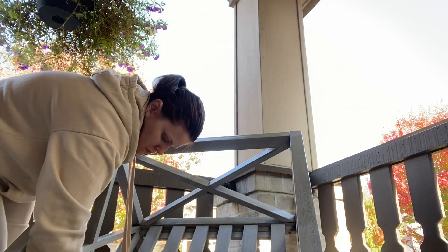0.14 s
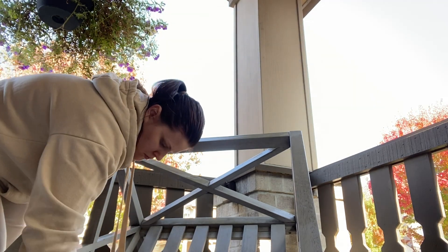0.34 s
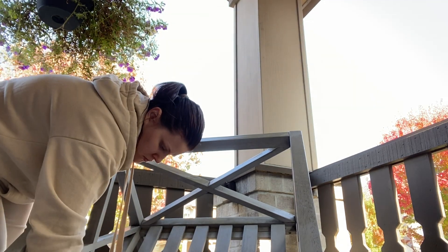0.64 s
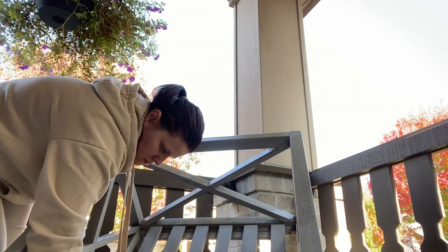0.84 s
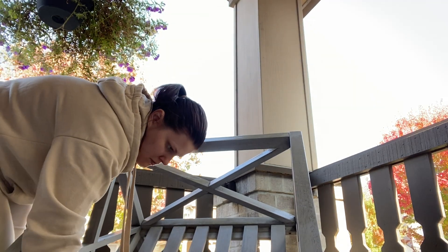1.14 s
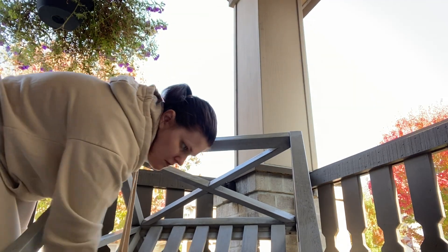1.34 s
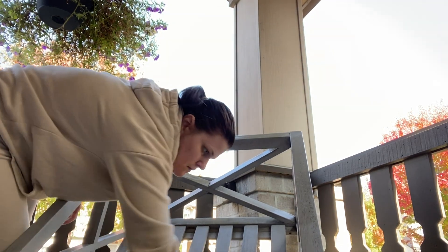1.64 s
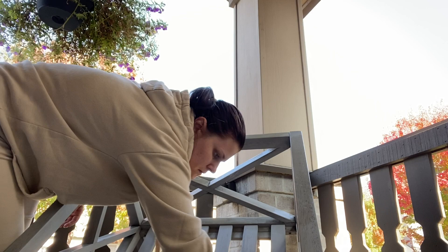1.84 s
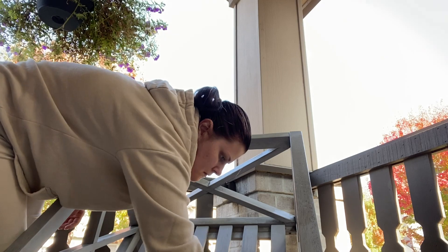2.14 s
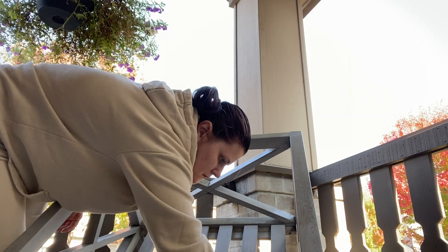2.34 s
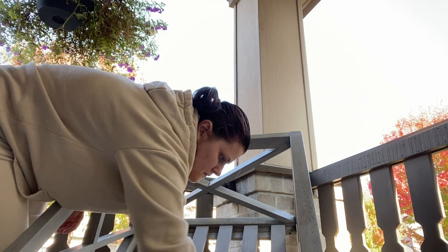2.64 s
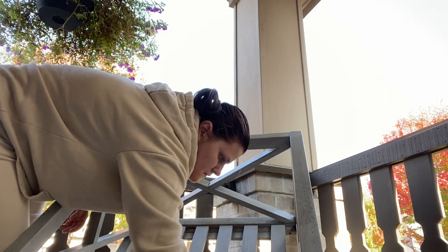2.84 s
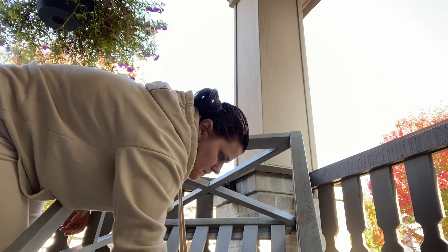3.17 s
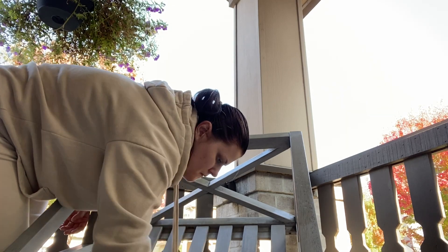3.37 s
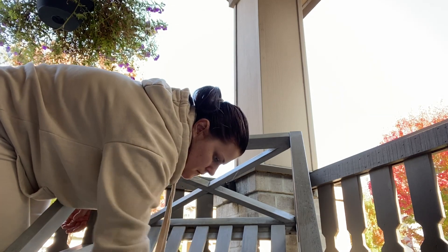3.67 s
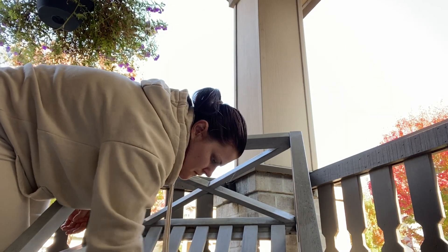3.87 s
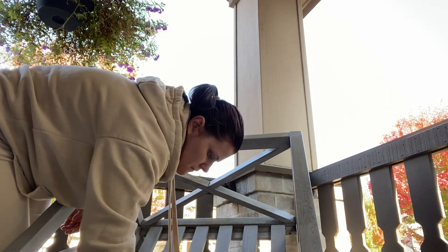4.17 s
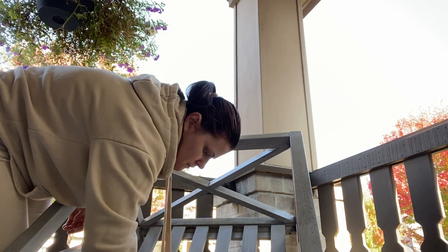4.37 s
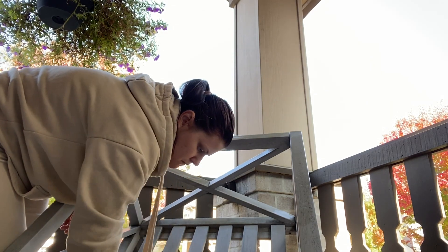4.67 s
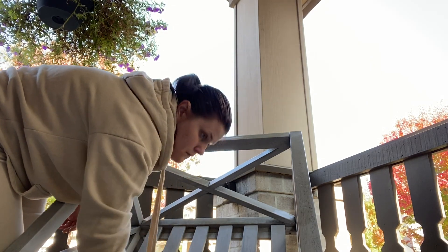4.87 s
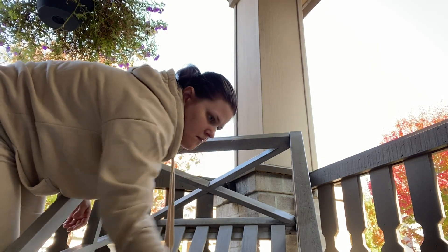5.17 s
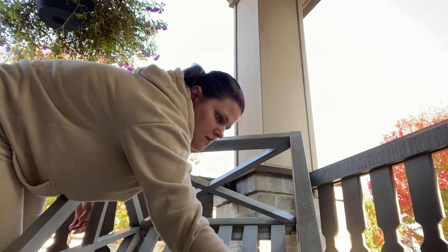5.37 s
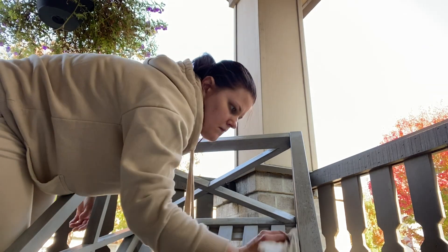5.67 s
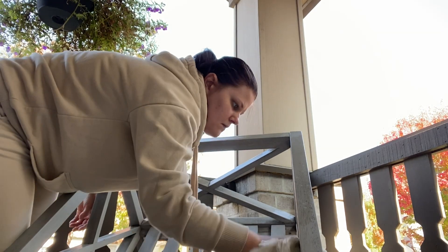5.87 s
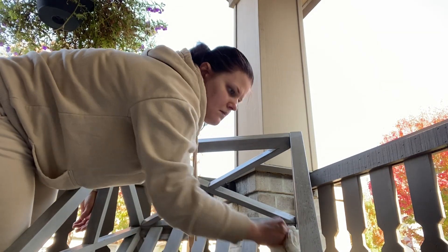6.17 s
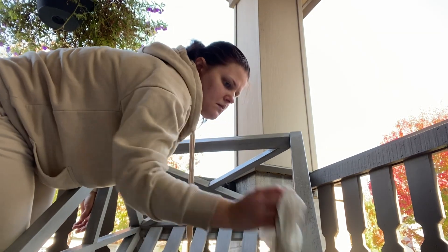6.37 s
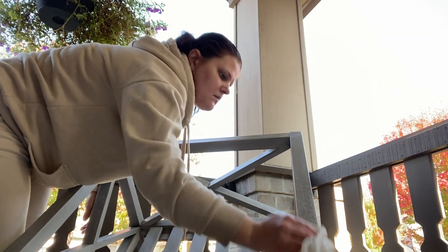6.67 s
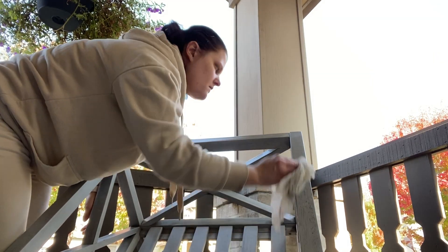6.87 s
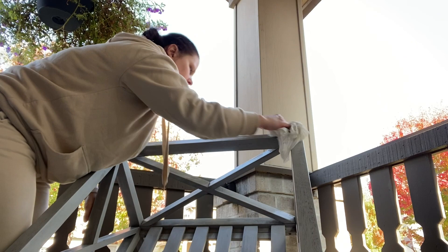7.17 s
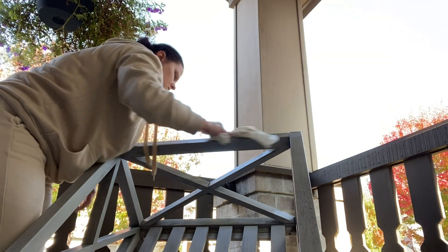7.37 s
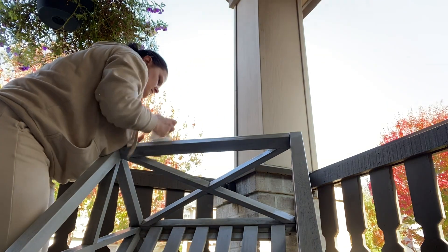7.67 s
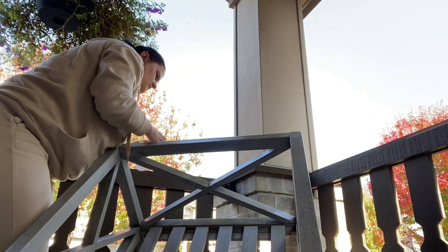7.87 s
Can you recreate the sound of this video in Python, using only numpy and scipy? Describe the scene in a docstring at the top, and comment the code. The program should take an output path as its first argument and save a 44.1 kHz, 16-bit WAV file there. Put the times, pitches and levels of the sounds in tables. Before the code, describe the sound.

Soft cloth wiping dominates the detail: short scrubs at first, denser and hissier around the middle, then longer, lighter sweeps. Low hollow knocks of the chair on deck boards stand out far louder than the wiping, especially in the later half. Brief slat squeaks and a few sharp ringing ticks punctuate it. A stereo microphone sits low and near the chair, outdoors, picking up deck thumps and distant road rumble.

```python
"""Distant traffic rumbles throughout, as shaped noise; from the start a cloth wipes a painted wooden chair
on a porch in short strokes of hiss and scrub noise. From 0.4 s the chair rocks and knocks its legs on the
deck boards: decaying modes and noise bursts. From 0.5 s single slats sing, as noise in narrow resonances.
From 1.3 s something small and hard ticks on a rail: noise clicks and ringing modes.
Two ports hear airborne bass nearly alike; the treble reaches the right one late and upside down."""
import sys
import numpy as np
from scipy import signal
from scipy.fft import rfft, irfft, next_fast_len
from scipy.io import wavfile
from scipy.ndimage import uniform_filter1d

SR = 44100
rng = np.random.default_rng(int(sys.argv[2]) if len(sys.argv) > 2 else 0)


def put_to_file(sound):
    """Save the sound as 16-bit audio at rate SR, in the file named by the first command-line argument."""
    columns = np.atleast_2d(sound).T  # one column per channel
    safe = np.clip(columns, -1, 1)
    whole_steps = np.round(safe * 32767)
    wavfile.write(sys.argv[1], SR, whole_steps.astype(np.int16))


N = 353241


def gain_of(db):
    """Decibels to gain."""
    return 10 ** (np.asarray(db) / 20)


def evened(x):
    """Scales to rms 1."""
    return x / np.sqrt(np.mean(x ** 2) + 1e-20)


def read(points, hz):
    """Reads a (Hz, value) table on a log frequency axis."""
    f, value = np.transpose(points)
    return np.interp(np.log(hz + 1), np.log(f + 1), value)


def add(mix, start_s, sound):
    """Lays a sound into the mix at start_s."""
    part = mix[:, round(start_s * SR):][:, :sound.shape[1]]
    part += sound[:, :part.shape[1]]


def band_pass(order, edges_hz):
    """Butterworth band-pass coefficients."""
    return signal.butter(order, edges_hz, "band", fs=SR)


def noise(colour_db, size, patchy_db, patch_hz, patch_s, lo_hz, hi_hz):
    """Two unrelated noises of one colour with drifting patches, rms 1 between lo_hz and hi_hz."""
    hop, hz = size // 4, np.fft.rfftfreq(size, 1 / SR)
    a, b, c, d, patches = rng.standard_normal((N // hop + 5, len(hz), 5)).T
    patches = uniform_filter1d(patches, max(round(patch_hz * size / SR), 1), 0)
    patches = evened(uniform_filter1d(patches, max(round(patch_s * SR / hop), 1), 1))
    level = gain_of(colour_db(hz)[:, None] + patchy_db * patches)
    in_band = (hz >= lo_hz) & (hz <= hi_hz)
    share = (level[in_band] ** 2).sum() / (level ** 2).sum()
    spectra = np.array([a + 1j * b, c + 1j * d]) * level
    sound = signal.istft(spectra, nperseg=size, noverlap=size - hop)[1][:, :N]
    return evened(sound) / np.sqrt(share)


def ring(modes, t, rise_s, scatter_db):
    """Modes struck together, swelling over rise_s, left peak 1; each blow favours them differently."""
    hz, db, t60_s, right_ratio = np.transpose(modes)[:, :, None]
    decay_db = db - 60 * t / t60_s + scatter_db * rng.standard_normal(hz.shape)
    size = gain_of(decay_db) * (1 - np.exp(-t / rise_s)) ** 2
    left = size * np.sin(2 * np.pi * hz * t)
    return np.array([left.sum(0), (right_ratio * left).sum(0)]) / abs(left.sum(0)).max()


# Road noise colour. Each row: frequency in Hz, level in dB.
RUMBLE_COLOUR = [(33, -44), (55, 4), (94, 1), (180, -8), (300, -15.5), (500, -18.5), (813, -19.5),
                 (1470, -42), (3000, -51.5), (15000, -84)]
# Slow swell. Each row: time in seconds, rumble level in dB, tyre roar in dB against the rumble.
TRAFFIC_SWELL = [(0, -45, -1), (.6, -44.5, 0), (1.8, -45.5, -4), (3.3, -44, -5), (4.15, -45.5, -3.5),
                 (4.6, -44.5, -3), (8.01, -45.5, -3.5)]


def traffic():
    """Far road noise, lumpy in the bass, swelling slowly; the tyre roar above it comes and goes."""
    s, rumble_db, roar_db = np.transpose(TRAFFIC_SWELL)
    t = np.arange(N) / SR
    road = noise(lambda hz: read(RUMBLE_COLOUR, hz), 2048, 2.3, 60, .15, 40, 200)
    roar = signal.filtfilt(*band_pass(1, [350, 1000]), road)
    rumble_gain = gain_of(np.interp(t, s, rumble_db))
    roar_gain = gain_of(np.interp(t, s, rumble_db + roar_db))
    return (road - roar) * rumble_gain + roar * roar_gain


# Strokes of the cloth. Each row: time of full speed in seconds, run-up in seconds, hold in seconds,
# gain of the fibre hiss in dB, gain of the slat scrub in dB.
CLOTH_STROKES = [(0, .05, 0.0012, -69, -59.5), (0.213, 0.038, 0.054, -65, -62), (0.432, 0.065, 0, -81, -82),
                 (0.547, 0.071, 0, -62.5, -65), (.645, 0.026, 0, -63, -68.5),
                 (0.785, 0.042, 0.0015, -70, -65.5), (0.952, 0.027, 0.0059, -66.5, -60),
                 (1.186, 0.23, 0.28, -74, -65), (1.607, 0.41, 0.086, -66.5, -68.5),
                 (1.82, 0.18, 0.032, -68, -60), (1.942, 0.055, 0.049, -66, -60),
                 (2.115, 0.042, 0.1, -71.5, -66), (2.3, 0.25, 0.13, -76, -69.5),
                 (2.397, 0.063, 0, -68, -54), (2.628, .033, 0, -75, -66), (2.811, 0.1, 0.075, -69, -58),
                 (3.159, 0.027, 0.043, -70.5, -65), (3.43, 0.024, 0.0012, -71, -58),
                 (3.578, 0.045, 0.0033, -77, -61.5), (3.628, 0.056, 0.0066, -60.5, -54.5),
                 (3.921, 0.051, 0.15, -72, -73), (4.032, 0.085, 0.017, -73, -64),
                 (4.085, 0.042, 0.044, -80, -65), (4.24, 0.059, 0.023, -71, -64.5),
                 (4.399, 0.029, 0.0037, -69, -52.5), (4.454, 0.059, 0.039, -62, -64),
                 (4.599, 0.14, 0, -63.5, -63), (4.735, 0.046, 0.05, -66.5, -65.5),
                 (4.875, 0.036, 0.039, -60.5, -64.5), (4.988, 0.28, 0.026, -70.5, -69),
                 (5.245, 0.36, 0.044, -67.5, -66), (5.412, 0.21, 0.038, -65, -66.5),
                 (5.551, 0.15, 0.077, -64, -72.5), (5.786, 0.12, 0, -67, -66.5),
                 (5.863, 0.034, 0.15, -63.5, -70.5), (6.107, 0.027, 0.054, -60, -66),
                 (6.473, 0.13, 0, -72, -71), (6.61, 0.099, 0.38, -70, -70), (7.012, .1, 0.066, -77, -76.5),
                 (7.148, 0.021, 0.39, -66, -67), (7.72, 0.017, 0.053, -88, -67.5),
                 (7.925, 0.056, 0.17, -76, -66)]
EDGE_DB, LIFT_S = -28.5, 0.1  # run-up and lift-off are timed to this level
RISE_BEND, LIFT_BEND = 1.3, 1.11  # 1 = straight in dB, more = rounder top
HISS_REST_DB, SCRUB_REST_DB = -85.5, -95.5  # the cloth never quite rests


def stroke():
    """Hiss and scrub gains: each stroke runs up, holds and lifts off; overlaps add in power."""
    t = np.arange(0, N, 64) / SR
    s, rise_s, hold_s, hiss_db, scrub_db = np.transpose(CLOTH_STROKES)[:, :, None]
    before = np.maximum(s - t, 0) / np.maximum(rise_s, .005)
    after = np.maximum(t - s - hold_s, 0) / LIFT_S
    shape_db = EDGE_DB * (before ** RISE_BEND + after ** LIFT_BEND)
    gains = []
    for db, rest_db in ((hiss_db, HISS_REST_DB), (scrub_db, SCRUB_REST_DB)):
        power = (gain_of(db + shape_db) ** 2).sum(0) + gain_of(rest_db) ** 2
        gains.append(np.interp(np.arange(N) / SR, t, np.sqrt(power)))
    return gains


# Hiss colour of the fibres. Each row: frequency in Hz, level in dB.
FIBRE_COLOUR = [(900, -18), (2000, 1), (4000, 4.5), (9000, 4.5), (14000, 2.5), (15800, -1.5)]
# Scrub colour. Each row: frequency in Hz, level in dB.
SCRUB_COLOUR = [(500, -3), (1100, 5), (1800, 5.5), (3000, 2.5), (4500, -4), (6000, -8), (9000, -21.5)]
# Slats under the cloth. Each row: frequency in Hz, width in Hz, boost in dB (half of it in the hiss).
SLAT_PEAKS = [(3770, 150, 2), (4420, 120, 1), (7500, 110, 0)]
# Spot being wiped. Each row: time in seconds, dB by which thin slats sound brighter than broad ones,
# level of the top of the hiss in dB.
WIPED_SPOT = [(.4, -2, -2), (.7, 21, -6), (1.15, -4, 2), (2.5, 0.5, -0.5), (3.5, 9, 1), (4.6, 4, -13),
              (5.3, -14, -5), (6.8, -6.5, 1)]


def slats_db(hz):
    """Boost of the slat resonances."""
    return sum(db / (1 + (2 * (hz - f) / width) ** 2) for f, width, db in SLAT_PEAKS)


def cloth():
    """Fibres hiss over the paint; where the hand presses, small slips sound the slats."""
    light, pressed = stroke()
    even_db, slips_db = 2.2, 2.9  # patchiness: dense fibres hiss more evenly than the slips
    hiss = noise(lambda hz: read(FIBRE_COLOUR, hz) + .5 * slats_db(hz),
                 512, even_db, 300, 0.067, 4400, 18500)
    scrub = noise(lambda hz: read(SCRUB_COLOUR, hz) + slats_db(hz), 512, slips_db, 150, .07, 1500, 7500)
    broad = signal.filtfilt(*signal.butter(2, 2500, fs=SR), scrub)
    low_hiss = signal.filtfilt(*signal.butter(2, 8500, fs=SR), hiss)
    s, thin_db, top_db = np.transpose(WIPED_SPOT)
    t = np.arange(N) / SR
    tilt = gain_of(np.interp(t, s, thin_db / 2))
    top = gain_of(np.interp(t, s, top_db))
    fibres = (low_hiss + (hiss - low_hiss) * top) * light
    slips = (broad / tilt + (scrub - broad) * tilt) * pressed
    return fibres + slips


# Frame modes. Each row: frequency in Hz, level in dB, t60 in seconds,
# size at the right port as a ratio to the left (negative = opposite phase).
FRAME_MODES = [(117.6, -0.5, 0.18, -0.89), (152, 7, 0.092, -0.35), (198, 3, 0.077, 1.63),
               (279.7, -2.5, 0.23, 0.048), (298.5, -1.5, 0.091, 2.02), (313.1, -8.5, 0.24, 1.43),
               (480.3, -2, 0.078, 0.39)]
# Deck board modes. Columns as for the frame: Hz, dB, t60 in seconds, right-to-left ratio.
DECK_MODES = [(54.43, -1.5, 0.73, 0.91), (73.6, 6, 0.21, 0.11), (96.2, 13, 0.087, 0.84)]
# Leg knocks, also played by cracks(). Each row: time in seconds, blow level in dB,
# deck thump level in dB, crack level in dB.
LEG_KNOCKS = [(0.435, -42, -56, -58), (0.58, -40.5, -63, -55.5), (1.356, -20, -68, -40),
              (1.368, -30, -32.5, -44), (1.705, -23, -30, -49), (3.161, -30.5, -35.5, -71),
              (3.183, -42, -39, -49), (5.687, -23, -31, -45), (5.704, -29.5, -61, -43.5),
              (6.21, -21, -30.5, -43.5), (6.365, -25, -28, -58), (6.456, -30.5, -52, -64),
              (6.744, -22, -31, -45), (6.982, -37, -59, -53.5)]


def knocks():
    """A leg lands: the frame modes ring at once, then the deck modes thump."""
    out, t = np.zeros((2, N)), np.arange(SR // 2) / SR
    unevenness_db = 1.5
    # the lower a board rings, the later it swells
    swell_s = 0.83 / np.transpose(DECK_MODES)[0][:, None]
    for s, blow_db, thump_db, _ in LEG_KNOCKS:
        add(out, s - .002, gain_of(blow_db) * ring(FRAME_MODES, t, 0.0045, unevenness_db))
        add(out, s + 0.0115, gain_of(thump_db) * ring(DECK_MODES, t, swell_s, unevenness_db))
    return out


def cracks():
    """Contact noise: a snap strongest in hard blows, a short clatter of slats, the joints settling."""
    out, t = np.zeros((2, N)), np.arange(SR // 4) / SR
    edges_hz = ([1400, 3250], [464, 1210], [1297, 1310], [164, 430])
    bands = [band_pass(2, hz) for hz in edges_hz]
    settling = .18 * (1 - np.exp(-t / .02)) ** 2 * np.exp(-t / .045)
    for s, blow_db, _, crack_db in LEG_KNOCKS:
        snap, clatter, hollow, joints = (
            evened(signal.lfilter(*band, rng.standard_normal((2, len(t))))) for band in bands)
        burst = gain_of(crack_db / 2 + 19) * snap * np.exp(-t / 0.0078)
        burst += clatter * np.exp(-t / 0.024)
        burst += hollow * np.exp(-t / 0.018)
        add(out, s - .0015, gain_of(crack_db) * (1 - np.exp(-t / 0.00074)) * burst)
        add(out, s, gain_of(blow_db) * joints * settling)
    return out


# The cloth catches and one slat sings. Each row: start in seconds, length in seconds
# (the fade to silence takes 2.1 lengths), frequency in Hz, level in dB.
SLAT_SINGS = [(0.525, 0.031, 2820, -72), (0.622, 0.041, 4640, -68.5), (0.755, 0.04, 3400, -71),
              (0.925, .04, 2820, -64.5), (0.62, 0.035, 2680, -63.5), (0.922, 0.034, 4600, -67),
              (2.743, 0.097, 3140, -66.5), (3.413, 0.022, 7750, -67), (3.604, 0.08, 2130, -68),
              (4.24, 0.02, 2170, -63), (4.385, 0.023, 1280, -53.5), (4.382, 0.08, 2630, -56),
              (4.385, 0.085, 4000, -59), (4.39, .055, 7470, -66), (4.71, .035, 3100, -77),
              (4.865, 0.026, 1980, -64), (1.754, .07, 680, -53)]
SING_WIDTH_HZ = 110


def singing():
    """Stick-slip noise held in one narrow slat resonance: quick start, slow fade."""
    out = np.zeros((2, N))
    for s, length_s, hz, db in SLAT_SINGS:
        t = np.arange(round(2.1 * length_s * SR)) / SR
        pole = np.exp((2j * hz - SING_WIDTH_HZ) * np.pi / SR)
        tone = signal.lfilter([1], [1, -pole], rng.standard_normal((2, SR // 2))).real
        tone = evened(tone[:, -len(t):])  # the resonance already built up
        fade = np.minimum(t / 0.0043, 1) * np.cos(np.pi / 2 * t / t[-1])
        add(out, s, gain_of(db) * tone * fade)
    return out


# Rail modes. Each row: frequency in Hz, level in dB, t60 in seconds.
RAIL_MODES = [(1250, -5.5, 0.14), (2025, 2, 0.23), (2110, -0.5, 0.12), (3840, -15, 0.12), (4540, 3, 0.05)]
# Ticks. Each row: start in seconds, click level in dB, rail ring in dB against the click,
# treble in dB against the click.
RAIL_TICKS = [(1.272, -56.5, -12, -28), (1.759, -73, -12, -25), (4.346, -62, -4, -16),
              (7.38, -44, 11.5, -11), (7.492, -45.5, 3.5, -34), (7.935, -43.5, -2, -1.5)]
# A tiny hard part, loud only in a ringing tick.
PING_HZ, PING_DB, PING_T60_S = 11280, -17.5, 0.05


def ticks():
    """Hard taps: a broad click with short scatter off the porch walls, and the rail ringing unevenly."""
    out, t = np.zeros((2, N)), np.arange(SR // 3) / SR
    body_band = signal.butter(3, [1300, 3770], "band", fs=SR, output="sos")
    treble_band = signal.butter(3, [6500, 12200], "band", fs=SR, output="sos")
    # direct click plus scatter
    body_decay = 1.14 * np.exp(-t / 0.0032) + 0.53 * np.exp(-t / 0.028)
    treble_decay = 1.54 * np.exp(-t / 0.0027) + 0.42 * np.exp(-t / 0.027)
    rail_modes = [(*mode, (-1) ** k) for k, mode in enumerate(RAIL_MODES)]  # right phase alternates
    for s, db, ring_db, treble_db in RAIL_TICKS:
        a, b, waver = rng.standard_normal((3, 2, len(t)))
        click = evened(signal.sosfilt(body_band, a)) * body_decay
        click += gain_of(treble_db) * evened(signal.sosfilt(treble_band, b)) * treble_decay
        rail = ring(rail_modes, t, 0.00027, 3.6)
        rail *= 1 + .5 * evened(uniform_filter1d(waver, 200))  # random waver, as of echoes beating
        ping = ring([(PING_HZ, PING_DB, PING_T60_S, 1)], t, 0.00092, 0)
        ping *= gain_of(PING_DB + 2 * ring_db)
        add(out, s, gain_of(db) * (click + gain_of(ring_db) * rail + ping))
    return out


# Likeness of the ports. Each row: frequency in Hz, left-right likeness from 0 to 1.
PORT_LIKENESS = [(40, 1), (250, 0.84), (520, 0.19), (1000, 0.3), (4500, 0.17), (6500, 0.13), (7800, 1)]
# Phase between the ports. Each row: frequency in Hz, radians by which the left leads.
LEFT_LEAD = [(300, -0.5), (520, -1.5), (750, -4), (1200, -1.5), (1800, -5.5), (5300, -16)]
# Level between the ports. Each row: frequency in Hz, left over right in dB.
LEFT_OVER_RIGHT = [(800, -1.1), (4000, -1.5), (8000, -0.5)]
LATE_S, IN_PHASE_HZ = 1 / 5200, 7950  # treble delay of the right port, where both ports agree in phase


def ports(paths):
    """Airborne sound: the right port shares part of the left path, turned in phase."""
    size = next_fast_len(N)
    hz = np.fft.rfftfreq(size, 1 / SR)
    left, other = rfft(paths, size)
    alike = np.clip(read(PORT_LIKENESS, hz), 0, 1)
    treble_lead = 2 * np.pi * (hz - IN_PHASE_HZ) * LATE_S
    lead = np.where(hz < LEFT_LEAD[-1][0], read(LEFT_LEAD, hz), treble_lead)
    right = (alike * left + np.sqrt(1 - alike ** 2) * other) * np.exp(-1j * lead)
    tilt = gain_of(read(LEFT_OVER_RIGHT, hz) / 2)
    return irfft(np.array([left * tilt, right / tilt]), size)[:, :N]


def scene():
    """Sounds through the air, and the knocks that come up through the deck."""
    return ports(traffic() + cloth() + cracks() + singing() + ticks()) + knocks()


def record(dry):
    """Band limit: a linear-phase low-pass at 15.9 kHz."""
    low_pass = signal.firwin(511, 15900, window=("kaiser", 9), fs=SR)
    return signal.oaconvolve(dry, low_pass[None], "same")


dry = scene()
out = record(dry)
put_to_file(out)
```